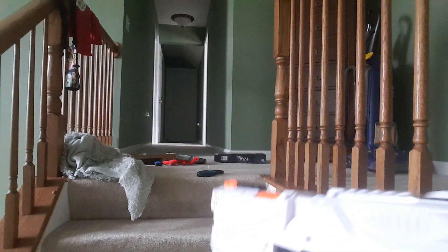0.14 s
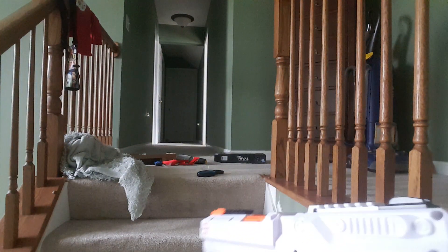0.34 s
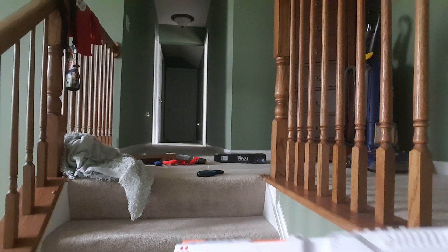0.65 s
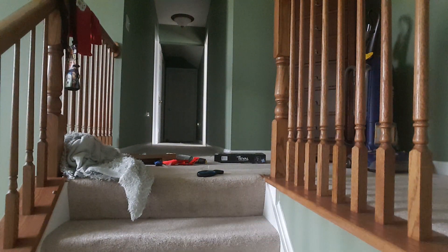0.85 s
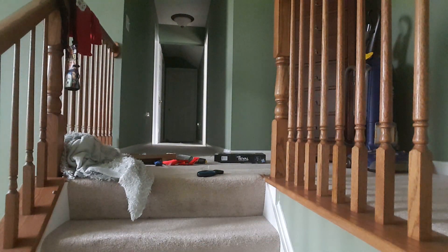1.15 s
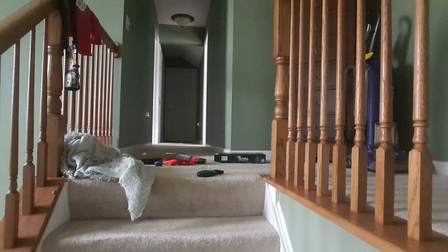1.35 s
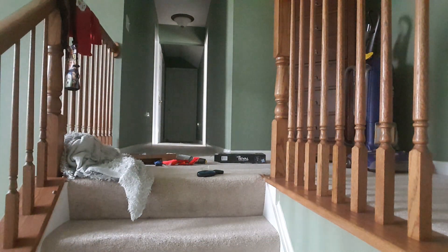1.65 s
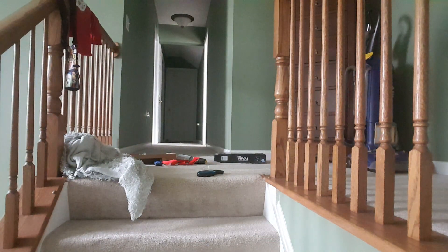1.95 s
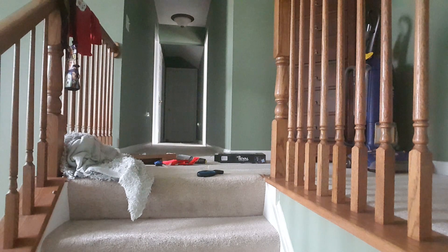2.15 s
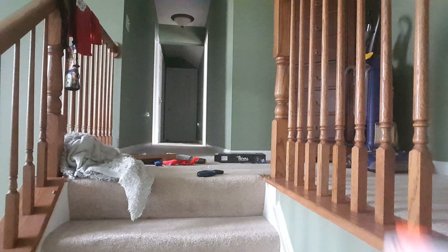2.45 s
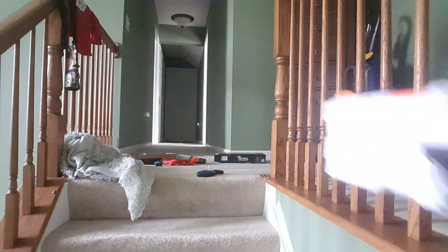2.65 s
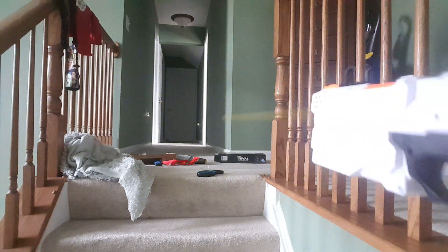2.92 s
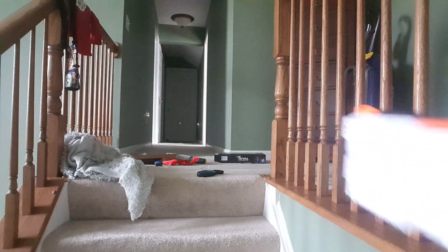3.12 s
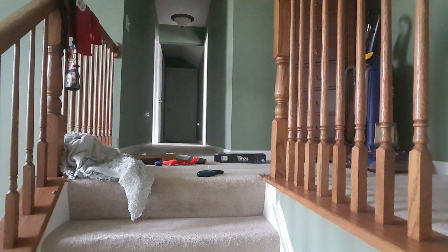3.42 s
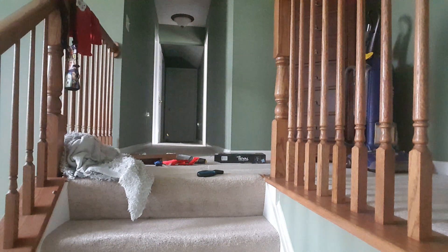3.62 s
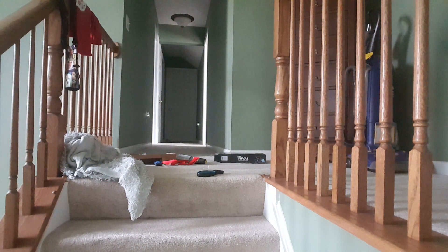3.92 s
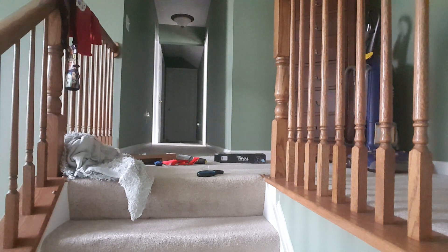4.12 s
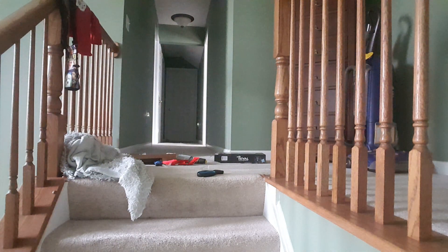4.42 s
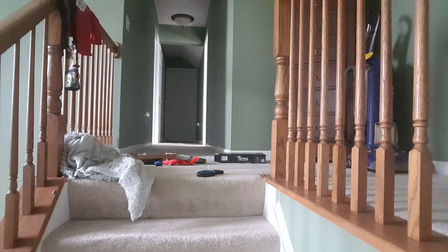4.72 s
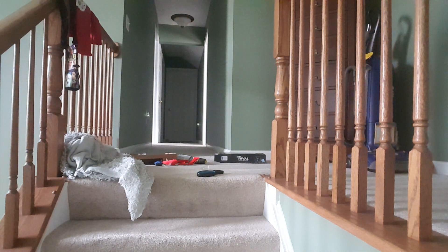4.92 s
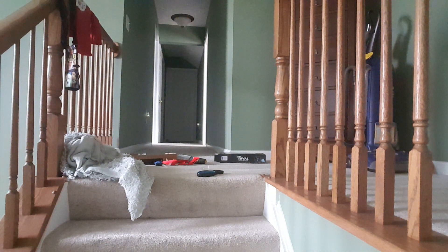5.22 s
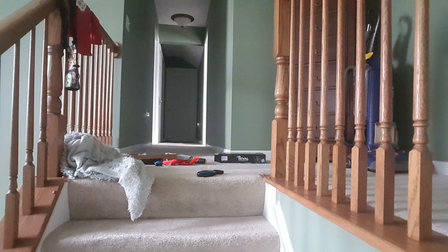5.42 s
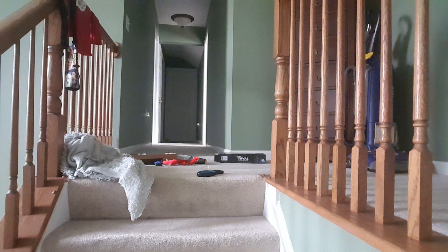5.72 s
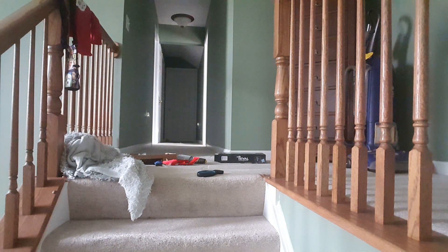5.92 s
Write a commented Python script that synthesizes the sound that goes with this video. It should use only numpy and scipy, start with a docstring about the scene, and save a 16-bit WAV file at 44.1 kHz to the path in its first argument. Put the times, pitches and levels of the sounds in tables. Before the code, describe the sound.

A plastic toy blaster ticks lightly in the hand, then its slide scrapes and clacks loudly as it is primed close to the microphone. It fires with a snap, a hollow pop and a brief spring ring, and a foam dart thumps a door down the hall. Two more rounds of plastic clacks follow. The stairwell rings briefly after each hit, over a faint rumble.

```python
"""Plastic scrapes and clacks, a snap with a hollow pop, a distant thump, then two more rounds of clacks.
A spring blaster is handled and primed close by on a stair landing: its slide rubs and hits its stops.
On firing, the plunger pops the barrel air, the spring rings and the dart thumps a door down the hall.
The slide is worked twice more. The hard-walled stairwell rings after every blow, over a faint rumble."""
import sys
import numpy as np
from scipy import signal
from scipy.fft import rfft, irfft, next_fast_len
from scipy.io import wavfile
from scipy.ndimage import map_coordinates

SR = 44100
rng = np.random.default_rng(int(sys.argv[2]) if len(sys.argv) > 2 else 0)


def digitize_waveform(pressure):
    """Quantize a signal to 16-bit integers and store it at the path in sys.argv[1].

    Rows of a 2-D input are taken as channels; values are limited to [-1, 1].
    """
    field = np.atleast_2d(pressure).T
    bounded = np.clip(field, -1, 1)
    quanta = np.round(bounded * 32767).astype(np.int16)
    wavfile.write(sys.argv[1], SR, quanta)


N = 267378
T = np.arange(SR) / SR  # 1 s time axis
BRIEF = T[:SR // 6]  # time axis of one contact

# slide strokes, plastic on plastic: (start [s], end [s], level [dB])
SLIDE_STROKES = [(1.072, 1.216, -61), (1.336, 1.419, -59.5), (1.814, 2.006, -39.5), (2.244, 2.325, -35),
                 (4.014, 4.05, -37), (4.056, 4.166, -31), (4.41, 4.484, -44.5), (4.524, 4.606, -44.5),
                 (5.198, 5.238, -32.5), (5.384, 5.419, -60), (5.542, 5.652, -41)]


def amp(db):
    return 10 ** (np.asarray(db) / 20)


def unit_rms(x):
    return x / np.sqrt(np.mean(x ** 2) + 1e-20)


def unit_hit(x):
    """Scale to the energy of 10 ms at rms 1."""
    return x / np.linalg.norm(x) * np.sqrt(SR / 100)


def curve(points, hz):
    """Interpolate (frequency [Hz], value) points on a log axis."""
    points_hz, values = np.transpose(points)
    return np.interp(np.log(hz + 1), np.log(points_hz), values)


def fade(t, t60_s):
    """Fall 60 dB in t60_s."""
    return np.exp(-np.log(1000) * t / np.maximum(t60_s, 1e-3))


def filtered(x, response):
    """Apply a complex frequency response."""
    n = x.shape[-1]
    n_fft = next_fast_len(n + 2048, True)
    return irfft(rfft(x, n_fft) * response(np.fft.rfftfreq(n_fft, 1 / SR)), n_fft)[..., :n]


def add(track, start_s, x):
    """Mix x into the track."""
    part = track[:, max(round(start_s * SR), 0):][:, :x.shape[-1]]
    part += x[..., :part.shape[-1]]


def noise(spectrum, size):
    """Coloured noise, rms 1."""
    return unit_rms(filtered(rng.standard_normal(size), lambda hz: amp(curve(spectrum, hz))))


def burst(spectrum, envelope):
    """Short puff of coloured noise."""
    white = np.pad(rng.standard_normal(len(envelope)) * envelope, (16, 0))[:len(envelope)]
    return unit_hit(filtered(white, lambda hz: amp(curve(spectrum, hz))))


def ring(modes, t, rise_s, scatter_db=0, detune=0, blur_hz=0):
    """Damped modes; each blow lands elsewhere, so strengths and pitches may scatter."""
    hz, db, t60_s = np.transpose(modes)[:, :, None]
    gain = amp(db + scatter_db * rng.standard_normal(hz.shape))
    hz = hz * np.exp(detune * rng.standard_normal(hz.shape))
    # crowded neighbouring modes blur each line: its phase wanders
    drift = np.cumsum(rng.standard_normal((len(hz), len(t))), axis=1) * np.sqrt(2 * np.pi * blur_hz / SR)
    waves = np.sin(2 * np.pi * (hz * t + rng.random(hz.shape)) + drift) * fade(t, t60_s)
    return unit_hit((gain * waves).sum(0) * (1 - np.exp(-t / rise_s)))


def diffuse(pair, alike_hz=750):
    """Sound from all sides: left and right agree only in the bass."""
    angle = lambda hz: np.arccos(np.exp(-(hz / alike_hz) ** 2)) / 2
    mid, side = filtered(pair, lambda hz: np.array([np.cos(angle(hz)), np.sin(angle(hz))]))
    return np.array([mid + side, mid - side])


def room_tone(level_db=-62):
    """Faint steady rumble of the house."""
    # rumble spectrum: (frequency [Hz], density [dB])
    spectrum = [(15, -46), (25, -30.5), (47, -4), (108, -9), (166, -8.5), (200, -18.5), (236, -12),
                (270, -17.5), (354, -14.5), (840, -24), (4870, -35.5), (14800, -44.5), (16000, -38.5)]
    return amp(level_db) * diffuse(np.array([noise(spectrum, N), noise(spectrum, N)]), alike_hz=300)


def stairwell(x, gap_s=0.00095, build_s=0.0018, early_gain=2.5, early_t60_s=0.061):
    """Near walls and steps answer first, then a diffuse tail whose treble dies soonest."""
    # reverberation time: (frequency [Hz], t60 [s])
    decay = [(100, .5), (250, 0.6), (700, 0.57), (2000, 0.57), (5000, 0.5), (8000, 0.48), (15000, 0.39)]
    # reflection strength: (frequency [Hz], gain [dB])
    walls = [(80, -4), (300, 0), (3000, 0), (8000, -1), (15000, -4)]
    hz, t, bands = signal.stft(rng.standard_normal((2, len(T))), SR, nperseg=256)
    bands = bands * fade(t, curve(decay, hz)[:, None]) * amp(curve(walls, hz))[:, None]
    tail = diffuse(signal.istft(bands, SR, nperseg=256)[1][:, :len(T)])
    onset = 1 - np.exp(-np.maximum(T - gap_s, 0) / build_s)
    tail = tail * onset * (1 + early_gain * fade(T, early_t60_s))
    return signal.fftconvolve(x[None], tail / np.linalg.norm(tail[0]), axes=1)


def heard(x, room_db, lead_s=0.0003253):
    """Direct sound, brighter and lead_s earlier on the left, plus the stairwell."""
    # the camera body shades the right port: (frequency [Hz], left minus right [dB])
    shade = [(300, 1.5), (1500, 3), (4000, 3.5), (8000, 6), (10500, 12), (15000, 15)]
    sides = np.array([[.5], [-.5]])
    ports = lambda hz: amp(sides * curve(shade, hz)) * np.exp(2j * np.pi * hz * lead_s * (sides - .5))
    direct = filtered(np.pad(x, (0, len(T) - 1)), ports)
    return direct + amp(room_db) * stairwell(x)


def brushing(edge_s=.012):
    """Skin hisses over the plastic as the grip shifts."""
    # hand movements: (start [s], end [s], level [dB])
    moves = [(1.068, 1.205, -67), (1.329, 1.42, -69)]
    # skin friction: (frequency [Hz], density [dB])
    spectrum = [(800, -7), (3000, 2), (7000, -1), (12000, -1.5), (16000, -8)]
    out = np.zeros((2, N))
    for start_s, end_s, db in moves:
        touch = np.clip(np.minimum(T, end_s - start_s - T) / edge_s, 0, 1)
        add(out, start_s, heard(amp(db) * touch * noise(spectrum, len(T)), room_db=-6))
    return out


def bumps(low_hz=170, rise_s=.002, t60_s=0.08):
    """Soft, dull knocks, heard mostly through the room."""
    # bumps: (time [s], level [dB], low-pass corner [Hz])
    hits = [(1.3, -50, 604), (1.39, -53, 700), (3.619, -49, 160), (4.538, -25.5, 1210), (4.55, -29.5, 620),
            (4.588, -34.5, 493), (4.635, -43, 726)]
    envelope = fade(BRIEF, t60_s) * (1 - np.exp(-BRIEF / rise_s))
    out = np.zeros((2, N))
    for time_s, db, high_hz in hits:
        band = lambda hz: 1 / (1 + (hz / high_hz) ** 3) * hz ** 3 / (hz ** 3 + low_hz ** 3)
        thud = unit_rms(filtered(rng.standard_normal(len(BRIEF)), band)) * envelope
        add(out, time_s, heard(amp(db) * thud, room_db=1.5, lead_s=0))
    return out


def click(treble_db, snap=0, chatter_t60_s=.03, ribs_db=-9, split_hz=6500):
    """A crack rings the ribs: a free snap (1) is sudden; a dull contact (0) starts slowly, chatters."""
    # contact crack: (frequency [Hz], density [dB])
    spectrum = [(100, -20), (300, -11), (700, -2), (1500, -.5), (2700, 1), (4500, -2), (8000, -2.5),
                (10000, -3), (13000, -7), (16000, -12)]
    # modes of the thin ribs and catch: (frequency [Hz], level [dB], t60 [s])
    rib_modes = [(1818, -3.5, 0.068), (2253, -0.5, 0.029), (2400, -1, 0.017), (2862, -7, .02),
                 (3500, -5.5, 0.006), (4510, 2, 0.054)]
    rise_s = .00025 * amp(-treble_db * (1 - snap))
    decay = (1 - .7 * snap) * fade(BRIEF, chatter_t60_s) + fade(BRIEF, t60_s=.011)
    envelope = decay * (1 - np.exp(-BRIEF / rise_s))
    shelf = lambda hz: amp(treble_db * hz ** 4 / (hz ** 4 + split_hz ** 4))
    crack = unit_hit(filtered(burst(spectrum, envelope), shelf))
    return crack + amp(ribs_db) * ring(rib_modes, BRIEF, rise_s, scatter_db=2, detune=.1, blur_hz=450)


def knock(centre_hz, focus_db=5.0):
    """The hollow shell rings; the place of the blow favours modes near one pitch."""
    # shell modes: (frequency [Hz], level [dB], t60 [s])
    shell_modes = [(331, -6.5, 0.075), (387.8, -2.5, 0.084), (439.7, -3.5, 0.057), (531, -3.5, 0.045),
                   (596, -2.5, 0.078), (693.5, -5.5, 0.088), (784.4, -3.5, 0.039), (895, -4, 0.04),
                   (1053.6, 5, 0.026), (1272, 0.5, 0.034), (1590, -3, .04)]
    modes = [(hz, db - focus_db * np.log2(hz / centre_hz) ** 2, t60_s) for hz, db, t60_s in shell_modes]
    return ring(modes, BRIEF, rise_s=0.0029, scatter_db=1.3, detune=.025)


def clack(click_db, knock_db, treble_db, centre_hz, snap=0, lag_s=0):
    """One plastic contact: click, then shell knock. Snap (0-1) makes the click louder and drier."""
    click_trim_db, knock_trim_db = -3.5 + 2 * snap, -3
    crack = amp(click_db + click_trim_db) * click(treble_db, snap)
    thud = amp(knock_db + knock_trim_db) * knock(centre_hz)
    thud = np.pad(thud, (round(lag_s * SR), 0))[:len(BRIEF)]
    return heard(crack, room_db=-1.5 - 3.5 * snap) + heard(thud, room_db=-7)


def ticks():
    """Parts shift lightly in the hand."""
    # light contacts: (time [s], level [dB])
    hits = [(0.642, -41), (0.948, -51.5), (0.977, -51), (1.083, -40), (1.178, -48.5), (1.225, -44),
            (1.338, -40), (1.468, -31), (1.754, -45.5), (2.767, -35), (2.86, -35), (3.975, -46),
            (4.97, -45), (5.043, -45.5)]
    out = np.zeros((2, N))
    for time_s, db in hits:
        add(out, time_s, clack(db - 12.5, db - 7.5, treble_db=-17.5, centre_hz=885, snap=0.41))
    return out


def sliding(grain_db=5, slips_per_s=450):
    """The slide sticks and slips in tiny grains; pressure eases at the end of each stroke."""
    # plastic friction: (frequency [Hz], density [dB])
    spectrum = [(100, -34), (380, 1), (650, 2.5), (1300, 3.5), (2800, -5.5), (5000, -16.5), (9000, -25),
                (16000, -27)]
    t = T[:len(T) // 2]
    out = np.zeros((2, N))
    for start_s, end_s, db in SLIDE_STROKES:
        roughness = map_coordinates(rng.standard_normal(len(t)), [t * slips_per_s], order=1)
        grains = unit_rms(amp(grain_db * roughness))
        pressure = np.interp(t / (end_s - start_s), [0, .25, .85, 1], [0.55, 0.61, 0.46, 0.07])
        add(out, start_s, amp(db) * heard(pressure * grains * noise(spectrum, len(t)), room_db=-7))
    return out


def rattle(count=2, above_rub_db=3.5, scatter_db=4.5):
    """Loose parts touch at random once a stroke is under way, scaled to its rubbing."""
    out = np.zeros((2, N))
    for start_s, end_s, rub_db in SLIDE_STROKES:
        for k in range(count):
            time_s = np.interp(k + rng.random(), [-1, count], [start_s, end_s])
            db = rub_db + above_rub_db + scatter_db * rng.standard_normal()
            add(out, time_s, clack(db, db, treble_db=-17.5, centre_hz=660))
    return out


def jolts():
    """The slide lurches against its guides and knocks the shell dully."""
    # lurches: (time [s], level [dB], knock centre [Hz])
    hits = [(1.832, -31.5, 720), (1.86, -22, 450), (1.901, -23, 430), (2.25, -23.5, 840),
            (2.2724, -20, 780), (4.029, -35, 640), (4.0507, -19.5, 750), (4.151, -27.5, 540),
            (4.477, -33.5, 600), (5.5418, -26.5, 810), (5.5575, -25, 740), (5.579, -18, 790)]
    out = np.zeros((2, N))
    for time_s, db, centre_hz in hits:
        add(out, time_s, clack(db - 7, db, treble_db=-21.5, centre_hz=centre_hz))
    return out


def snaps():
    """The catch jumps over its teeth and the trigger lets go."""
    # releases: (time [s], level [dB])
    hits = [(1.8894, -21.5), (2.023, -15.5), (2.0378, -19.5), (2.1545, -27.5), (2.2796, -13.5),
            (2.293, -15), (2.9703, -21.5), (4.1, -25.5), (4.1764, -15), (4.2011, -16), (5.1668, -43),
            (5.3935, -29)]
    out = np.zeros((2, N))
    for time_s, db in hits:
        add(out, time_s, clack(db, db - 3, treble_db=-12.5, centre_hz=700, snap=.9))
    return out


def slams(rebounds=3, gap_s=.0095, gap_spread=.15, hard_db=-13.5):
    """Slide or plunger hits a stop, brighter when harder; the parts rebound, ever weaker."""
    # stop impacts: (time [s], click [dB], knock [dB], knock centre [Hz], clatter t60 [s])
    hits = [(1.9483, -19, -21.5, 467, 0.05), (2.0474, -15, -12.5, 534, 0.14),
            (2.3183, -14.5, -14.5, 530, 0.16), (2.98, -16, -10.5, 600, 0.049),
            (4.071, -15, -16, 581, 0.066), (4.213, -17.5, -15, 570, 0.19), (4.4427, -19, -12, 684, 0.041),
            (5.229, -15.5, -16.5, 537, 0.052), (5.5886, -12, -14.5, 650, 0.42),
            (5.6313, -14, -15.5, 522, 0.056)]
    out = np.zeros((2, N))
    for time_s, click_db, knock_db, centre_hz, clatter_t60_s in hits:
        treble_db = -7.5 + 1.6 * min(click_db - hard_db, 0)
        add(out, time_s, clack(click_db, knock_db, treble_db, centre_hz, snap=.5, lag_s=0.003026))
        for delay_s in np.cumsum(gap_s * np.exp(gap_spread * rng.standard_normal(rebounds))):
            rebound = clack(click_db - 4, knock_db - 0.5, treble_db, centre_hz)
            add(out, time_s + delay_s, fade(delay_s, clatter_t60_s) * rebound)
    return out


def spring():
    """The released coil strikes its tube and rings."""
    # coil strikes: (time [s], level [dB])
    hits = [(3.014, -25), (3.054, -27.5)]
    # coil modes: (frequency [Hz], level [dB], t60 [s])
    coil_modes = [(1685, -9, 0.42), (2200, -19, 0.41), (2462, 1, 0.086), (2817, -8.5, 0.25)]
    out = np.zeros((2, N))
    for time_s, db in hits:
        twang = ring(coil_modes, T, rise_s=.002, scatter_db=1.6, blur_hz=11)
        add(out, time_s, heard(amp(db) * twang, room_db=-4))
    return out


def dart(time_s=3.382, panel_db=-13, slap_db=-23, tick_db=-39, panel_top_hz=900):
    """The foam dart ticks and slaps against the far door, whose panel booms."""
    # door panel modes: (frequency [Hz], level [dB], t60 [s])
    door_modes = [(195, -16, 0.78), (233.4, -13, 0.59), (291, -11.5, 0.86), (328.7, 3, 0.39),
                  (359.8, -1.5, 0.36), (418, -7, 0.25), (471, -7, 0.75), (526, -5, 0.15), (644, 3, 0.16),
                  (760, -8, 0.31)]
    # foam slap: (frequency [Hz], density [dB])
    spectrum = [(120, -12), (330, 4), (600, 5.5), (1000, -4), (1700, -17.5), (3000, -25.5), (7000, -38.5),
                (16000, -50)]
    out = np.zeros((2, N))
    panel = ring(door_modes, T, rise_s=.014, blur_hz=9)
    panel = filtered(panel, lambda hz: 1 / (1 + (hz / panel_top_hz) ** 8))
    add(out, time_s, heard(amp(panel_db) * panel, room_db=-13, lead_s=0))
    slap = burst(spectrum, T * fade(T, t60_s=.06))
    add(out, time_s, heard(amp(slap_db) * slap, room_db=2, lead_s=0))
    add(out, time_s, heard(amp(tick_db) * click(treble_db=-8), room_db=-3.5, lead_s=0))
    return out


def shot(time_s=2.980, echo_s=3.025, pulse_s=.0015, pop_db=-6, puff_db=-14, pulse_db=-19, echo_db=-15):
    """The plunger slams home: the barrel pops and a puff of air leaves the muzzle."""
    # air modes of plunger tube and barrel: (frequency [Hz], level [dB], t60 [s])
    barrel_modes = [(149, -10, .12), (263, -5, 0.13), (349.6, -12.5, 0.34), (446, -11.5, 0.2),
                    (461, -10, 0.11), (643, 7, 0.14), (681, 5.5, 0.03), (742, -2.5, .12), (897, -20, .12),
                    (1132, -7.5, 0.071), (1290, -24, .15), (1737, -7.5, 0.26), (1766, -18, 0.6)]
    # muzzle puff: (frequency [Hz], density [dB])
    spectrum = [(100, -17.5), (300, 2.5), (700, 4.5), (1700, -0.5), (3000, -5.5), (5000, -10.5),
                (7000, -16.5), (10000, -16), (16000, -29)]
    out = np.zeros((2, N))
    add(out, time_s, heard(amp(pop_db) * ring(barrel_modes, T, rise_s=.005), room_db=-8))
    add(out, time_s, heard(amp(puff_db) * burst(spectrum, fade(T, t60_s=0.14)), room_db=0))
    pressure_pulse = (1 - T / pulse_s) * np.exp(-T / pulse_s)
    add(out, time_s, amp(pulse_db) * pressure_pulse)
    # the muzzle points down the hall, which throws the puff back late and blurred
    add(out, echo_s, amp(echo_db) * stairwell(burst(spectrum, T * fade(T, t60_s=.1))))
    return out


def scene():
    contacts = snaps() + slams() + jolts() + ticks() + rattle()
    return contacts + sliding() + brushing() + shot() + spring() + dart() + bumps() + room_tone()


def record(dry, low_hz=40, top_hz=15850):
    """The camera rounds the highest peaks, thins the deep bass and cuts off above its band limit."""
    rounded = dry / (1 + np.abs(dry) ** 4) ** (1 / 4)
    return filtered(rounded, lambda hz: 1j * hz / (low_hz + 1j * hz) / (1 + (hz / top_hz) ** 200))


dry = scene()
out = record(dry)
digitize_waveform(out)
```